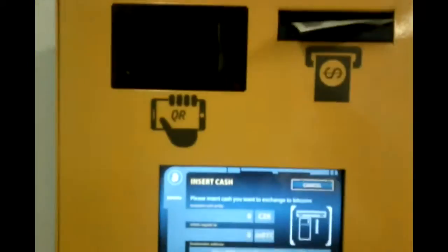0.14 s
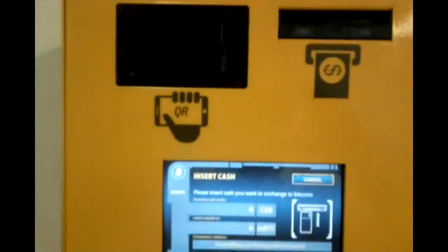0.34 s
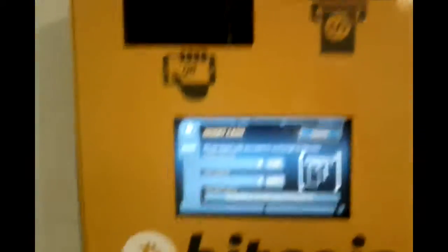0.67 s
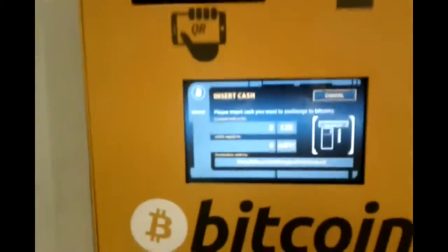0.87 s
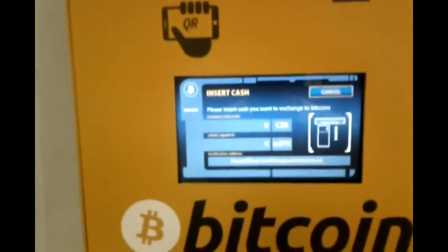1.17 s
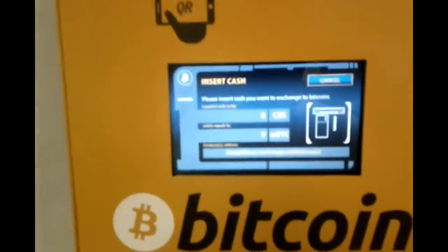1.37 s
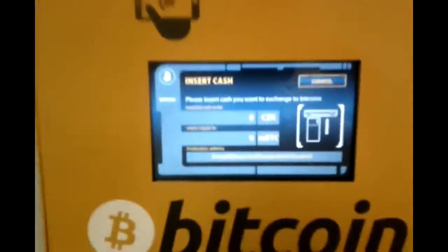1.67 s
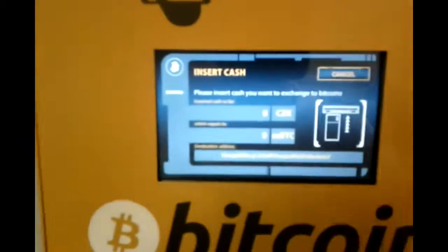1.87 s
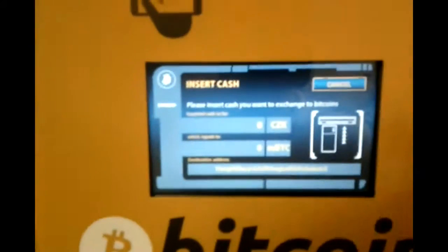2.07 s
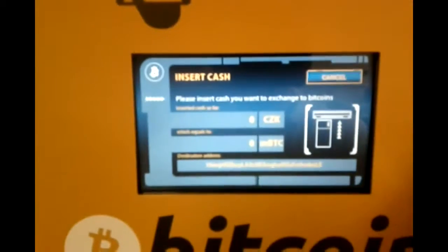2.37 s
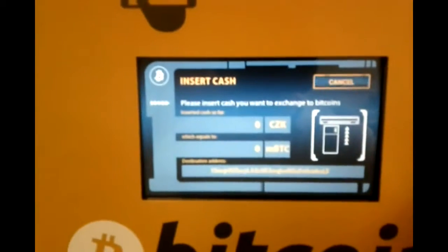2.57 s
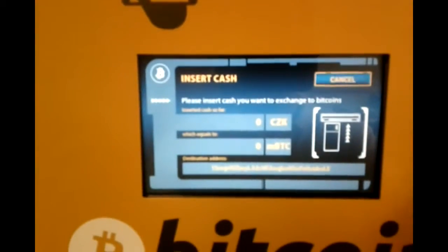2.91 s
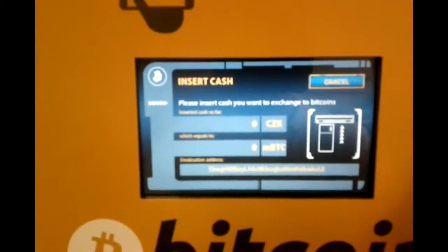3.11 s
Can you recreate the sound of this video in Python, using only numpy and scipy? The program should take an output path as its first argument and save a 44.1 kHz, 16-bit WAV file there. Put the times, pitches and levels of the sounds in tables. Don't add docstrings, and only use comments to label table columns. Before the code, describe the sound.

A banknote acceptor's small geared motor whirs twice, after a plastic flap slaps and paper slides in; sharp clacks and roller rubs end the first run. Quiet room, close, dull narrow-band microphone.

```python
import sys
import numpy as np
from scipy import signal
from scipy.fft import rfft, irfft, next_fast_len
from scipy.io import wavfile
from scipy.ndimage import uniform_filter1d, map_coordinates

SR = 44100
rng = np.random.default_rng(int(sys.argv[2]) if len(sys.argv) > 2 else 0)


def output_pcm(signal):
    pcm = np.clip(np.atleast_2d(signal).T, -1, 1) * 32767
    wavfile.write(sys.argv[1], SR, np.round(pcm).astype(np.int16))


def level_to_linear(level):
    exponent = np.asarray(level, float) / 20
    return 10 ** exponent


N = 143325


def unit(x):
    return x / np.sqrt(np.mean(x ** 2) + 1e-20)


def along(points, hz):
    f, v = np.transpose(points)
    return np.interp(np.log(hz + 1), np.log(f + 1), v)


def wobble(rate):
    t = np.arange(N) / SR
    coarse = np.arange(0, N + 8, 8) / SR
    knots = rng.standard_normal(int(N * rate / SR) + 4)
    return np.interp(t, coarse, map_coordinates(knots, [coarse * rate]))


def filtered(x, response):
    m = next_fast_len(N + 8192)
    return irfft(rfft(x, m) * response(np.fft.rfftfreq(m, 1 / SR)), m)[..., :N]


def bumps(rows):
    return lambda f: level_to_linear(sum(db / (1 + ((f - c) / (w / 2)) ** 2) for c, w, db in rows))


def hiss(points, lumps_db=0):
    noise = rng.standard_normal(N) * level_to_linear(lumps_db)
    return unit(filtered(noise, lambda hz: level_to_linear(along(points, hz)) * (hz < 12000)))


def gate(t0, t1, rise, fall):
    t = np.arange(N) / SR
    return level_to_linear(-20 * (np.maximum(t0 - t, 0) / abs(rise) + np.maximum(t - t1, 0) / abs(fall)))


# f/Hz, level/dB
AIR_SPECTRUM = [(18, -69.5), (30, -14.5), (302, -1.5), (338, -7.5), (387, -4.5), (453, -9), (507, -6.5),
                (1020, -12.5), (6690, -24), (8700, -56), (14700, -120)]


def air_floor():
    return level_to_linear(-47.5 + 1.1 * wobble(13)) * hiss(AIR_SPECTRUM)


def room(x, t60, gap_s):
    t = np.arange(SR // 2) / SR
    tail = rng.standard_normal(len(t)) * level_to_linear(-60 * t / t60) * (t >= gap_s)
    return signal.fftconvolve(x, tail / np.linalg.norm(tail))[:N]


# start t/s, end t/s, full speed f/Hz, level/dB
DRIVE_RUNS = [
    (0.491, 1.11, 185.8, -45.5),
    (2.762, 3.155, 182.6, -46.5),
    (3.184, 3.25, 186, -50.5),
]
# multiple of the speed, level/dB
DRIVE_OVERTONES = [
    (1, 3),
    (3.2, -4),
    (4.21, -3.5),
    (4.96, -1.5),
]


def hum():
    out, t = np.zeros(N), np.arange(N) / SR
    sag, spinup_s, flutter_db = 0.11, 0.022, 2
    for t0, t1, hz, db in DRIVE_RUNS:
        speed = hz * (1 - sag * np.exp(-np.maximum(t - t0, 0) / spinup_s))
        turn = 2 * np.pi * np.cumsum(speed) / SR
        tone = sum(level_to_linear(rel_db + flutter_db * wobble(29.83)) * np.sin(k * turn) for k, rel_db in DRIVE_OVERTONES)
        out += level_to_linear(db) * np.sqrt(2) * gate(t0, t1, 0.03, 0.079) * tone
    return out


# f/Hz, width/Hz, level/dB
FRAME_MODES = [(1100, 390, 3), (1810, 250, 3), (3130, 450, 0), (4200, 300, 1.5), (5150, 400, 0.5)]


def friction(rows, colour):
    t = np.arange(N) / SR
    level = np.zeros(N)
    for t0, t1, db0, db1, t60 in rows:
        level += level_to_linear(np.interp(t, [t0, t1], [db0, db1])) * gate(t0, t1, 0.007, t60 / 3)
    grains_db = 1.5 * wobble(800) + 0.8 * wobble(90)
    z = signal.stft(hiss(colour, grains_db), nperseg=256)[2]
    field = uniform_filter1d(rng.standard_normal(z.shape), size=4, axis=0)
    field = uniform_filter1d(field, size=4, axis=1)
    patchy_db = 2.5 * unit(field)
    patchy = signal.istft(z * level_to_linear(patchy_db), nperseg=256)[1][:N]
    return level * unit(filtered(patchy, bumps(FRAME_MODES)))


# start t/s, end t/s, level/dB at start, level/dB at end, fade t60/s
COASTING_STROKES = [
    (.005, .075, -34, -37.5, .05),
    (.21, .42, -40, -37, .1),
    (3.17, 3.3, -34, -46.5, .1),
]
# f/Hz, level/dB
DULL_SPECTRUM = [(88, -32), (150, -10), (428, -1), (1200, -3), (1500, -5), (2000, -3), (2660, -7.5),
                 (6690, -5.5), (8700, -38), (14700, -120)]


def coasting():
    return friction(COASTING_STROKES, DULL_SPECTRUM)


# start t/s, end t/s, level/dB at start, level/dB at end, fade t60/s
NOTE_STROKES = [
    (.1, .205, -28, -27.5, 0.13),
    (1.63, 1.75, -49.5, -51, 0.33),
    (1.81, 1.828, -44, -45, 0.016),
]
# f/Hz, level/dB
PAPER_SPECTRUM = [(120, -52), (200, -20), (1040, -7.5), (1520, -7), (1660, -7.5), (3510, -6.5), (5450, -2),
                  (6690, -6.5), (8700, -39.5), (14700, -120)]


def note_sliding():
    return friction(NOTE_STROKES, PAPER_SPECTRUM)


# start t/s, end t/s, level/dB at start, level/dB at end, fade t60/s
ROLLER_STROKES = [(1.05, 1.08, -24, -37, 0.038), (1.087, 1.11, -23, -27, 0.057),
                  (1.11, 1.2, -28.5, -28.5, 0.04), (1.204, 1.222, -27, -27, .03),
                  (1.226, 1.254, -17, -27.5, 0.054), (1.268, 1.3, -27.5, -41.5, 0.38),
                  (2.704, 2.716, -35, -32, 0.046)]
# f/Hz, level/dB
RUBBER_SPECTRUM = [(120, -40), (200, -26), (365, -18.5), (1180, -6), (2730, -6), (2980, -9.5), (5210, 0.5),
                   (6690, -7.5), (8700, -17), (14700, -120)]


def rollers():
    return friction(ROLLER_STROKES, RUBBER_SPECTRUM)


def impacts(rows, width=0.085, snap_db=-12):
    out, t, snap = np.zeros(N + SR), np.arange(SR // 8) / SR, hiss(RUBBER_SPECTRUM)
    knock_hz, knock_width, blow_s = 1290, 0.255, 0.00062
    for s, db, hz, t60, knock_db in rows:
        spread = np.linspace(-1, 1, 5)[:, None] + rng.uniform(-0.2, 0.2, (5, 1))

        def modes(centre, wide):
            return np.sin(2 * np.pi * centre * (1 + wide * spread) * t).sum(0) / 4

        at = round(s * SR)
        body = modes(hz, width) + level_to_linear(knock_db) * modes(knock_hz, knock_width)
        body += level_to_linear(snap_db) * hz / 5000 * np.resize(snap[at:], len(t))
        out[at:][:len(t)] += level_to_linear(db - 60 * t / t60) * (1 - np.exp(-t / blow_s)) * body
    return out[:N]


# t/s, peak level/dB, ring f/Hz, t60/s, knock level/dB
TAP_BLOWS = [
    (1.8165, -30, 2500, .012, -20),
    (1.8215, -31, 2300, .015, -20),
    (1.824, -27, 2400, .013, -18),
    (1.8288, -13, 2380, .012, -13),
    (1.8286, -23, 3500, .007, -20),
    (1.8288, -27, 4500, .006, -20),
    (1.8288, -29, 6500, .008, -20),
]


def taps():
    return impacts(TAP_BLOWS, snap_db=-24)


# t/s, peak level/dB, ring
# f/Hz, t60/s, knock level/dB
CLACK_BLOWS = [(.082, -26.5, 585, .06, -10), (.087, -27, 790, 0.097, -22), (.099, -20.5, 816, 0.062, -17),
               (.46, -35.5, 433, 0.52, -30), (1.0365, -23, 775, 0.041, -12), (1.14, -24, 1100, 0.14, -24),
               (.35, -33.5, 432, 0.12, -22), (1.0385, -4, 5440, 0.033, -14), (1.087, -11, 4930, 0.018, -26),
               (1.0915, -9, 5260, .03, -31), (1.096, -16, 3710, 0.048, -23), (1.2045, -27, 5520, .04, -24),
               (1.228, -10.5, 5480, 0.06, -14), (1.2634, -2, 4845, 0.032, -23), (.437, -27, 4400, .1, -18),
               (2.722, -27, 4400, .08, -23), (3.192, -15.5, 3920, .02, -1),
               (3.1945, -13.5, 2484, .04, -10.5), (3.2, -28, 2730, .025, -10)]


def flap_clacks():
    return impacts(CLACK_BLOWS)


# t/s, peak level/dB, ring f/Hz, t60/s, knock level/dB
ENTRY_BLOWS = [(0, -11, 5150, .04, -22), (0, -15, 6400, .035, -30), (0, -17, 3320, .035, -24),
               (.0035, -13, 3300, .016, -18), (.0033, -12, 5950, .022, -30), (.001, -17, 4270, .035, -30),
               (.0795, -21, 4550, .025, -12), (.0828, -5, 6350, .018, -30), (.083, -8, 5150, .035, -18),
               (.0825, -12, 4500, .04, -20), (.083, -19, 2900, .045, -10), (.0875, -12, 5950, .035, -20),
               (.088, -17, 3320, .04, -14), (.089, -17, 6700, .02, -30), (.0938, -8, 5750, .015, -20),
               (.0935, -15, 3300, .022, -16), (.1015, -19, 6200, .025, -30), (.1015, -20, 5100, .03, -20),
               (.0975, -21, 4400, .015, -30)]


def entry_flap():
    return impacts(ENTRY_BLOWS, width=0.015, snap_db=-13)


# t/s, shaft speed f/Hz, rattle level/dB, mesh load level/dB
MOTOR_RUNS = [
    [(0.425, 88.5, -34.5, -19), (0.448, 95.4, -34.5, 0.5), (0.464, 99.7, -36, 2.5), (0.5, 107.1, -33, -0.5),
     (0.598, 110.1, -31, 1.5), (0.792, 108.8, -30.5, 4.5), (0.844, 108.5, -30, 1), (1.03, 110, -30.5, 3.5),
     (1.035, 109.4, -22, 6)],
    [(2.71, 90.1, -37, -6), (2.728, 96.5, -35, 0), (2.748, 101.5, -33, 1), (2.78, 105.7, -34, 3.5),
     (2.962, 107.1, -30, 3), (3.048, 105.2, -34, 4.5), (3.108, 110.7, -28.5, 1.5), (3.155, 110.2, -28.5, 3)],
]
# shaft order, level/dB in first run, level/dB in second under load, level/dB once free
MESH_ORDERS = [(11, -45, -53, -42), (12, -33, -44, -32.5), (13, -42.5, -47, -42), (21, -52.5, -73, -55),
               (22, -47, -57, -62), (23, -41.5, -41.5, -42), (24, -51, -43, -35.5), (25, -40.5, -40, -45),
               (26, -68, -57, -50), (33, -40.5, -37, -40), (34, -69, -58, -49), (35, -37.5, -52, -52),
               (36, -37.5, -38, -38), (37, -45, -38.5, -52), (40, -42, -57, -56), (46, -40, -54, -50),
               (47, -48.5, -53, -46), (48, -49.5, -56, -57), (49, -42.5, -52, -54), (59, -71.5, -51, -46),
               (61, -72, -45.5, -43.5)]
# f/Hz, width/Hz, level/dB
PANEL_MODES = [(1050, 70, -6.5), (2300, 70, 10), (2710, 130, 3.5), (3410, 560, -10), (3890, 450, 4)]
# f/Hz, level/dB
RATTLE_SPECTRUM = [(120, -37), (200, -13.5), (677, -11), (1310, -13), (1500, -16.5), (2500, -8.5),
                   (3030, -7.5), (3890, -8.5), (6690, -5), (8700, -58), (14700, -120)]
# f/Hz, width/Hz, level/dB
HOUSING_MODES = [(788, 32, 9), (1263, 214, 11), (1800, 690, 9), (2380, 420, 3.5), (4110, 360, 9),
                 (4400, 120, 1), (5220, 700, 2), (6500, 160, -6)]
# f/Hz, width/Hz, level/dB
NOTE_DAMPING = [
    [],
    [(1290, 610, -2.5), (2030, 160, -7.5), (4250, 300, -5)],
]


def motor():
    out, t = np.zeros(N), np.arange(N) / SR
    free = 1 / (1 + np.exp(np.clip((3.06 - t) / 0.027, -50, 50)))
    group_lag = 2.1
    for k, run in enumerate(MOTOR_RUNS):
        s, hz, rattle_db, load_db = np.transpose(run)
        speed = np.interp(t, s, hz) * (1 + 0.001 * wobble(40))
        turn = 2 * np.pi * np.cumsum(speed) / SR

        mesh = np.zeros(N)
        for row in MESH_ORDERS:
            order = round(row[0])
            line_db = row[1 + k] + free * (row[-1] - row[1 + k]) + 2 * wobble(45)
            phase = order * (turn + group_lag * round(row[0] / 12))
            mesh += level_to_linear(line_db) * np.sqrt(2) * np.cos(phase)
        mesh = filtered(mesh, bumps(PANEL_MODES))

        rattle = hiss(RATTLE_SPECTRUM, 3 * wobble(1200))
        rattle = filtered(rattle, bumps(HOUSING_MODES + NOTE_DAMPING[k]))
        rattle = unit(rattle + 0.6 * room(rattle, 0.05, 0))
        rattle *= 1 + 0.15 * np.cos(turn)
        level_db = uniform_filter1d(np.interp(t, s, rattle_db), size=900) + 5 + wobble(25.03)

        both = level_to_linear(np.interp(t, s, load_db)) * mesh + level_to_linear(level_db) * rattle
        out += gate(s[0], s[-1], 0.021, 0.016) * both
    return out


def scene():
    machine = motor() + note_sliding() + rollers() + coasting() + flap_clacks() + entry_flap()
    echo = level_to_linear(-15) * room(machine, 0.2, 0.004)
    return np.tile(machine + echo + hum() + taps() + air_floor(), (2, 1))


def band_limit(x):
    return signal.sosfilt(signal.butter(12, 11130, fs=SR, output="sos"), x)


# f/Hz, level/dB
MIC_RESPONSE = [(60, -5.5), (150, 0), (6750, -1), (7000, -11.5), (7600, -26), (7900, -73)]
# f/Hz, level/dB
IMAGE_LEAK = [(8600, -75.5), (9100, -21.5), (9400, -23.5), (10000, -38.5), (10600, -56), (11200, -78)]
# f/Hz, level/dB
SIDE_SPECTRUM = [(1300, -72.5), (1900, -22), (2600, -14.5), (3400, -22.5), (4200, -27.5), (6800, -53.5),
                 (7200, -9.5), (10000, -19)]


def record(dry):
    t = np.arange(N) / SR
    mirror = dry[0] * 2 * np.cos(2 * np.pi * 16000 * t)
    mid = filtered(dry[0], lambda hz: level_to_linear(along(MIC_RESPONSE, hz)))
    mid += filtered(mirror, lambda hz: level_to_linear(along(IMAGE_LEAK, hz)))
    mid += level_to_linear(-92) * np.sin(2 * np.pi * 11025 * t)
    side = filtered(mid * unit(wobble(200)), lambda hz: level_to_linear(along(SIDE_SPECTRUM, hz)))
    return band_limit(np.array([mid + side, mid - side]))


dry = scene()
out = record(dry)
output_pcm(out)
```